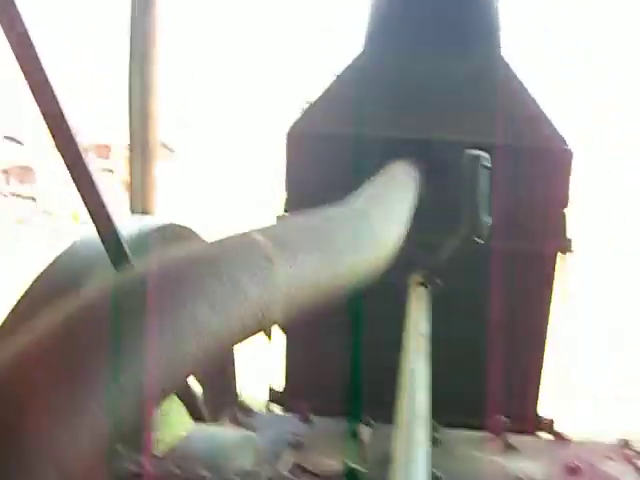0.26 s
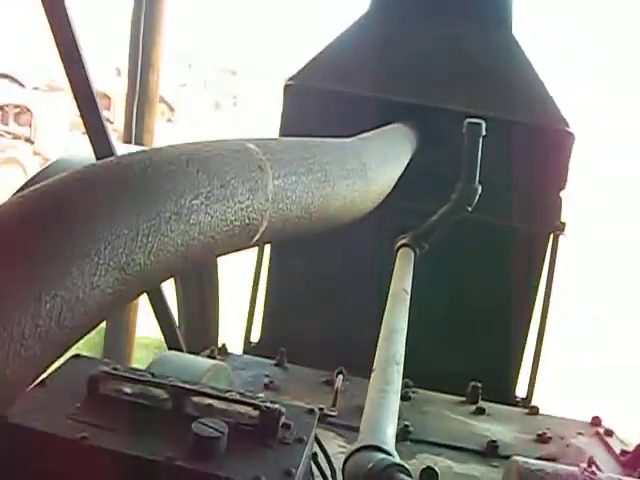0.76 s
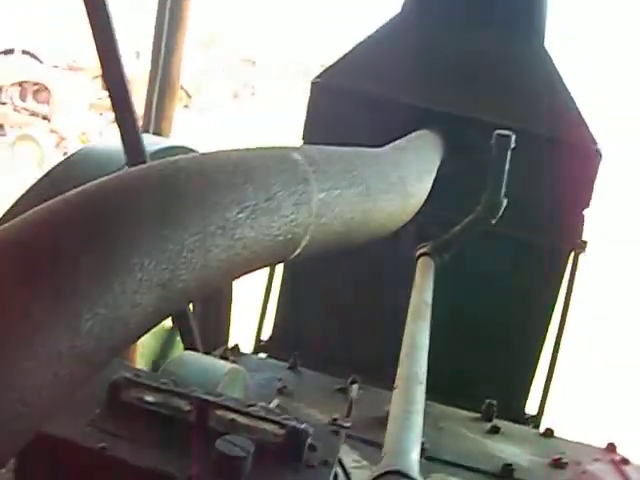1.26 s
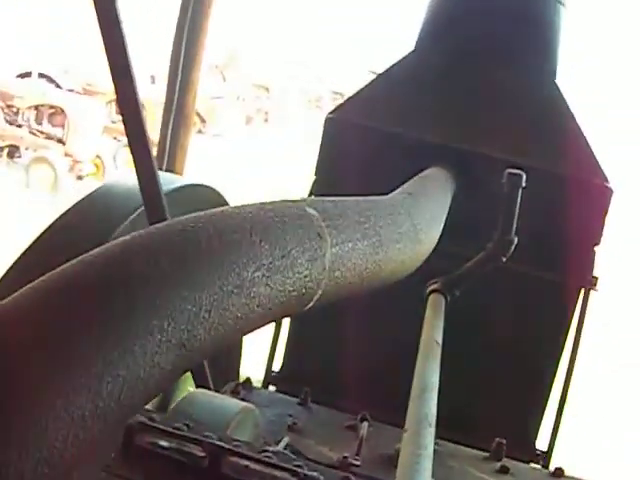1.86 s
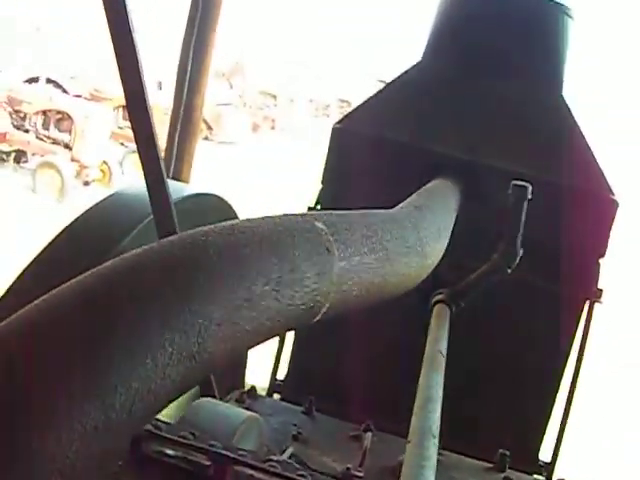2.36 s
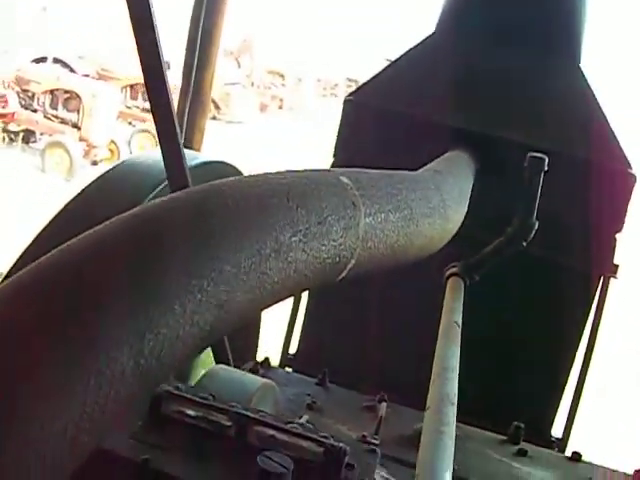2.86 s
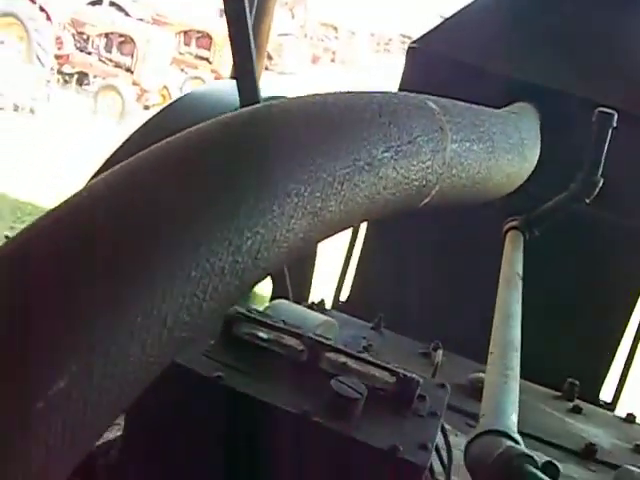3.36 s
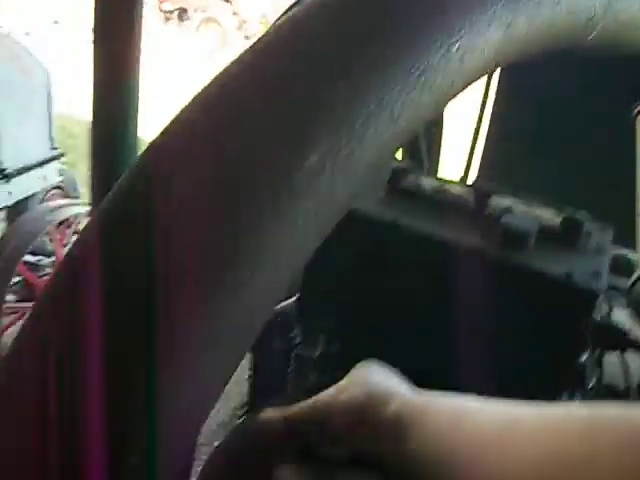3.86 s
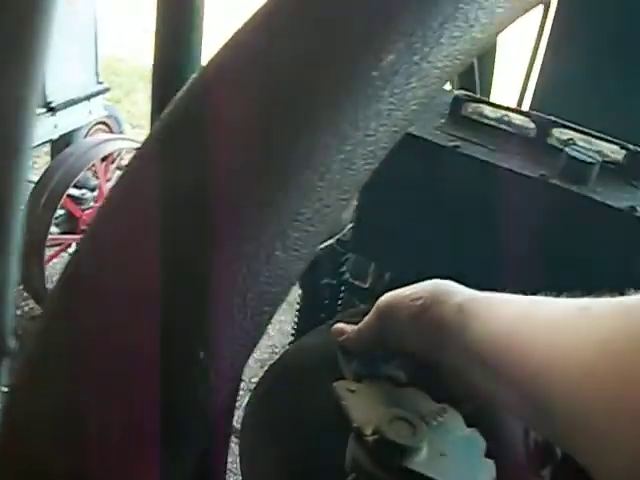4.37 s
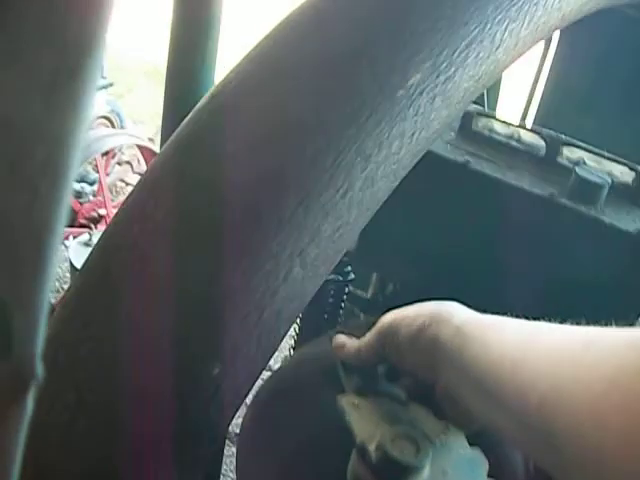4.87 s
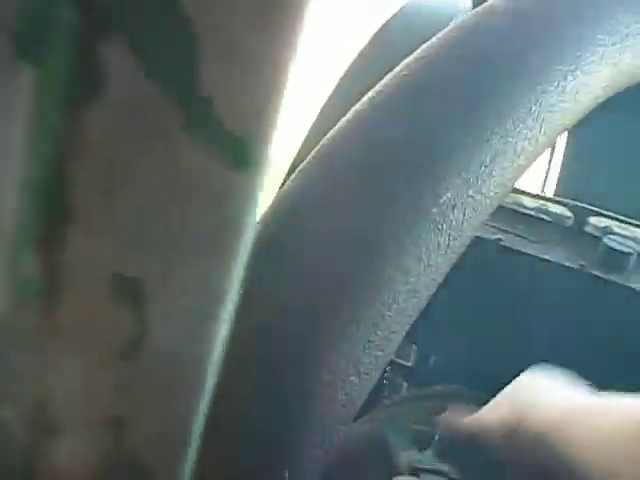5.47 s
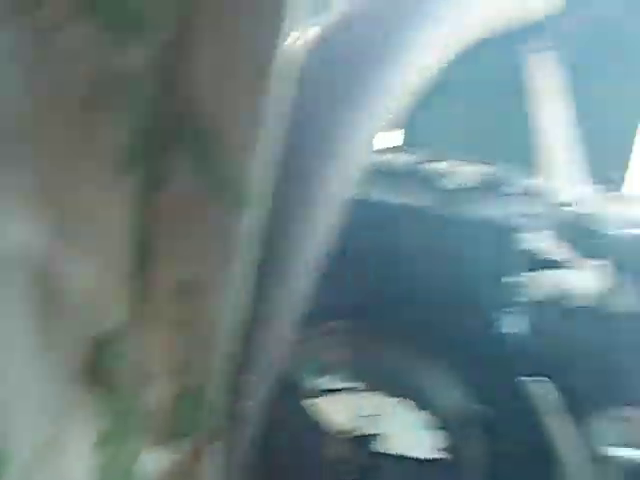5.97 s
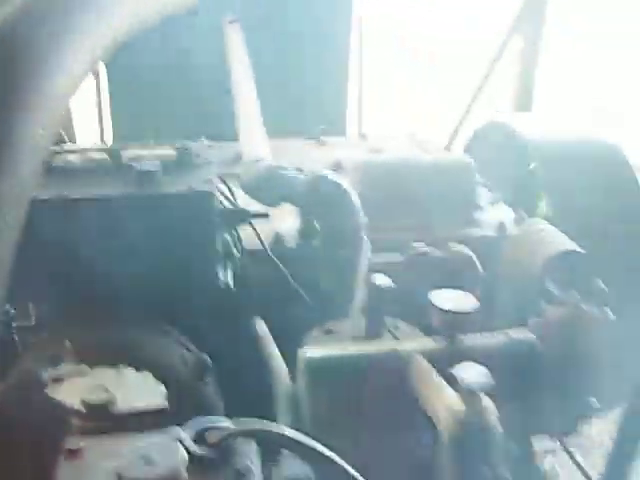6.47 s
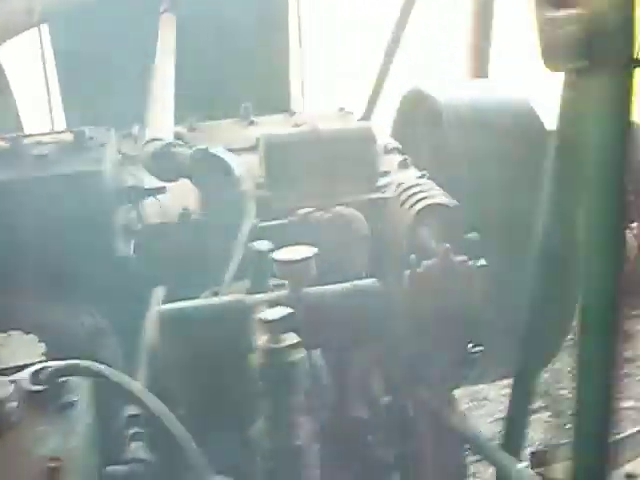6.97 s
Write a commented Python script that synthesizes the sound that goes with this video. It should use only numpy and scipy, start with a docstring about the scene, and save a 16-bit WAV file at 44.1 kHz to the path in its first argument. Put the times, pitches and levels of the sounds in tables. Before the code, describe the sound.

Close by, a slow old tractor engine puffs and thumps steadily while loose metal parts knock, tick and rattle.

```python
"""An old, slow tractor engine chugs and clatters, heard from its platform.
Every half turn the exhaust lets out a puff that hisses and thumps. Loose parts knock on the iron
castings (the engine's body) and the steel valve gear ticks and scrapes, over a dense patter and roar.
One microphone picks it all up; it turns itself down and overloads on the hardest puffs."""
import sys
import numpy as np
from scipy import signal
from scipy.fft import rfft, irfft, next_fast_len
from scipy.io import wavfile
from scipy.ndimage import uniform_filter1d

SR = 44100
rng = np.random.default_rng(int(sys.argv[2]) if len(sys.argv) > 2 else 0)


def bounce(signal):
    """Save signal as a 16-bit WAV file at the path given by the first command-line argument."""
    frames = np.transpose(np.atleast_2d(signal))
    limited = np.clip(frames, -1, 1)
    pcm = np.round(limited * 32767).astype(np.int16)
    wavfile.write(sys.argv[1], SR, pcm)


N = 318402

# exhaust puffs: (time [s], hiss level [dB], thump level [dB])
EXHAUST_PUFFS = [(0.0677, -13, -18.5), (0.289, -14.5, -54), (0.487, -13, -17.5), (0.709, -19.5, -37.5),
                 (0.908, -12, -26.5), (1.132, -15.5, -18), (1.332, -15, -30), (1.552, -12, -21.5),
                 (1.757, -12.5, -18.5), (2.1748, -5, -6.5), (2.358, -21.5, -26), (2.578, -7, -6),
                 (2.967, -5.5, -3.5), (3.175, -25, -18.5), (3.529, -15, -27), (3.715, -7.5, -5.5),
                 (3.912, -20, -25), (4.0886, -11.5, -21.5), (4.287, -12.5, -43), (4.5, -13, -31.5),
                 (4.839, -10, -18), (5.043, -14.5, -45.5), (5.254, -11.5, -47), (5.419, -17, -38),
                 (5.6, -11, -16.5), (5.796, -12, -41), (6.006, -14.5, -33), (6.181, -13.5, -18.5),
                 (6.361, -8.5, -29), (6.738, -14, -34), (6.95, -18.5, -21.5), (7.13, -13, -16)]
# modes (notes a part rings at) of the iron castings: (pitch [Hz], width [Hz], level [dB])
IRON_LOW_MODES = [(164, 31, -6), (298, 57, 2.5), (355.3, 20, 5), (456.4, 76, 2), (539, 36, 4), (632, 66, 5),
                  (732, 41, 8.5), (805, 109, 1.5), (910, 70, 1.5), (1031, 60, 1)]
IRON_HIGH_MODES = [(1333, 180, -1), (1450, 20, 3.5), (1535, 100, -3), (2210, 1100, -16)]
# modes of the steel valve gear: (pitch [Hz], width [Hz], level [dB])
STEEL_LOW_MODES = [(2358, 20, -5.5), (2550, 170, -2.5), (3107, 100, -8.5), (3436, 110, -10)]
STEEL_HIGH_MODES = [(3895, 70, -1), (4190, 40, -2.5), (4370, 540, 1.3), (5090, 43, -3.5)]


def amp(db):
    """Turns decibels into a factor to multiply by."""
    return 10 ** (np.asarray(db) / 20)


def unit(x):
    """Scales x to an average (rms) level of 1."""
    return x / np.sqrt(np.mean(x ** 2) + 1e-20)


def add(track, start_s, sound):
    """Mixes a sound into the track from start_s on."""
    part = track[max(round(start_s * SR), 0):][:len(sound)]
    part += sound[:len(part)]


def filtered(x, response):
    """Multiplies each frequency in x by response(hz)."""
    size = next_fast_len(N + SR // 2)
    return irfft(rfft(x, size) * response(np.fft.rfftfreq(size, 1 / SR)), size)[..., :N]


def coloured(x, spectrum):
    """Shapes x by (Hz, dB) points, silent outside them; the result has level 1."""
    points_hz, db = np.transpose(spectrum)
    return unit(filtered(x, lambda hz: amp(np.interp(np.log(hz + 1), np.log(points_hz), db, -120, -120))))


def resonate(force, modes):
    """A force makes a part ring at its modes; steady white noise keeps its level."""
    def response(hz):
        return sum((-1) ** k * amp(db) * 1j * hz * width / (pitch ** 2 - hz ** 2 + 1j * hz * width)
                   for k, (pitch, width, db) in enumerate(modes))
    gain = np.sqrt(sum(amp(db) ** 2 * width * np.pi / SR for _, width, db in modes))
    return filtered(force, response) / gain


def patter(per_s, spread_db, fade_s):
    """The loudness curve of many small random hits, uneven in strength, each fading away."""
    when, chance = rng.random((int(per_s * N / SR), 2)).T
    strength = amp(-spread_db * np.log(0.039 + 0.53 * chance))
    hits = np.bincount((when * N).astype(int), strength ** 2, N)
    power = signal.lfilter([1], [1, -np.exp(-1 / (fade_s * SR))], hits)
    return unit(np.sqrt(power))


def clatter(modes, per_s, spread_db, fade_s):
    """Loose parts strike different spots, so each mode gets its own hits."""
    sound = np.zeros(N)
    for hz, width, db in modes:
        force = patter(per_s, spread_db, fade_s) * rng.standard_normal(N)
        sound += amp(db) * resonate(force, [(hz, width, 0)])
    return unit(sound)


def struck(events, low_modes, high_modes, blow, rise_s, tail_s):
    """A blow and the rattle after it ring a part's low and high modes."""
    forces, t = np.zeros((2, N)), np.arange(SR // 5) / SR
    for s, db, high_db, length_s in events:
        rattle = np.exp(-t / tail_s) / (1 + (t / length_s) ** 3)
        force = amp(db) * (1 - np.exp(-t / rise_s)) * (rattle + blow * np.exp(-t / 0.0014))
        high_share = amp(high_db)
        add(forces[0], s, force * np.sqrt(1 - high_share ** 2))
        add(forces[1], s, force * high_share)
    low, high = forces * rng.standard_normal((2, N))
    sound = resonate(low, low_modes) + resonate(high, high_modes)
    power = lambda x: np.abs(uniform_filter1d(x ** 2, size=400)) + 1e-5
    # partly even out the noise's random swells, so each rattle follows its blow and fades smoothly
    return sound * np.minimum(power(np.hypot(*forces)) / power(sound), 4) ** 0.25


def pipe_hum(noise):
    """The exhaust pipe hums on a low note and swells half a turn after each thump."""
    level, t = np.full(N, amp(-27.5)), np.arange(SR // 2) / SR
    half_turn_s, width_s = 0.2, 0.098
    swell = np.exp(-((t - half_turn_s) / width_s) ** 2)
    for s, _, thump_db in EXHAUST_PUFFS:
        add(level, s, amp(min(thump_db - 10, -20.5)) * swell)
    hum = resonate(noise, [(76.6, 14.3, 0)])
    loudness = np.abs(signal.hilbert(hum, next_fast_len(N))[:N])
    return level * unit(hum / (loudness + 0.26) ** 0.4)  # partly even out the hum's random swells


def roar():
    """Loose parts patter on the castings and in the valve gear; the pipe hums; the frame rumbles."""
    # loudness of the running engine: (time [s], castings level [dB], valve gear level [dB])
    levels = [(0.0, -9, -19), (0.14, -25, -22.5), (0.24, -19.5, -24), (1.29, -17, -24), (1.9, -19, -22),
              (2.25, -25.5, -31), (2.48, -25.5, -27.5), (3.05, -23.5, -28.5), (3.27, -23, -31.5),
              (3.4, -15, -20), (4.1, -22, -28.5), (4.22, -11, -21), (4.34, -21.5, -30), (4.52, -16, -21.5),
              (4.83, -19.5, -26), (5.29, -15, -21.5), (5.8, -21, -30.5), (6.05, -16, -22), (6.6, -19, -27),
              (6.8, -13.5, -17.5), (6.92, -19, -26.5), (7.22, -17, -22)]
    # tone of the castings, the valve gear and the frame: (frequency [Hz], level [dB])
    iron_tone = [(59, -30.5), (100, -2), (193, -2.5), (285, 4.5), (399, -1.5), (454, 1), (566, -5.5),
                 (627, 1), (723, -1.5), (1210, -9.5), (1880, -14.5), (4840, -120)]
    gear_tone = [(1500, -18), (2000, 2.5), (2600, 5), (4000, 0), (4700, 6.5), (5200, -1.5), (5450, -12.5),
                 (6400, -32)]
    frame_tone = [(15, -13), (30, -2), (60, -15), (130, -12), (250, -10.5)]
    times, *columns = np.transpose(levels)
    iron_level, gear_level = [amp(np.interp(np.arange(N) / SR, times, db)) for db in columns]
    noise = rng.standard_normal((4, N))
    heavy = patter(per_s=66, spread_db=8.8, fade_s=0.073)  # heavy parts shake both castings and gear
    iron = coloured(noise[0] * (0.42 + 0.11 * heavy + 0.22 * patter(150, 11, 0.0018)), iron_tone)
    iron += 0.71 * clatter(IRON_LOW_MODES, 10, 2.5, 0.021)
    iron += 0.21 * clatter(IRON_HIGH_MODES, 14, 6, 0.011)
    gear = coloured(noise[1] * (0.1 + 1.2 * heavy + 0.57 * patter(140, 11, 0.005)), gear_tone)
    gear += 0.5 * clatter(STEEL_LOW_MODES + STEEL_HIGH_MODES, 45, 3.5, 0.004)
    rumble = amp(-11.5) * coloured(noise[3], frame_tone)
    whole = iron_level * (iron + rumble) + gear_level * gear + pipe_hum(noise[2])
    return filtered(whole, lambda hz: amp(-(np.maximum(hz - 5500, 0) / 30) ** 2))  # cut the top treble


def knocks():
    """Heavy parts with slack in them hammer the castings."""
    # knocks: (time [s], level [dB], share of the high modes [dB], rattle length [s])
    hits = [(0.003, -6, -8.5, 0.012), (0.152, -15.5, -24.5, 0.24), (0.418, -10.5, -13, 0.047),
            (0.552, -23.5, -28, 0.094), (0.624, -16.5, -6.5, 0.061), (0.862, -14, -10.5, 0.034),
            (1.07, -12.5, -9.5, 0.037), (1.414, -13, -24.5, 0.042), (1.693, -12.5, -18, 0.047),
            (1.88, -12.5, -15, 0.06), (2.098, -10.5, -23, 0.038), (2.153, -10, -16.5, 0.024),
            (2.313, -13, -16, 0.095), (2.53, -9, -6.5, 0.043), (2.709, -15.5, -11.5, 0.092),
            (2.909, -13, -10.5, 0.076), (3.636, -12.5, -6, 0.029), (3.659, -8.5, -13.5, 0.019),
            (4.065, -8, -7.5, 0.032), (4.165, -17.5, -9, 0.1), (4.411, -10, -7.5, 0.035),
            (4.62, -11, -9.5, 0.015), (4.78, -10, -12.5, 0.062), (4.912, -10, -31, 0.015),
            (4.986, -14.5, -17.5, 0.034), (5.142, -16, -13, 0.15), (5.557, -5, -10.5, 0.025),
            (5.957, -14.5, -5, 0.059), (6.308, -13, -6, 0.04), (6.516, -15, -4.5, 0.024),
            (6.659, -15, -9, 0.12), (7.089, -11, -13.5, 0.045)]
    return struck(hits, IRON_LOW_MODES, IRON_HIGH_MODES, blow=0.7, rise_s=0.0012, tail_s=0.27)


def exhaust():
    """Each puff is a hissing jet that drops as the port shuts, and a thump of pressure in the pipe."""
    # tone of the gas jet: (frequency [Hz], level [dB])
    jet_tone = [(800, -15.5), (2000, -17), (2800, -11.5), (4500, -7.5), (5450, -8), (6400, -12.5)]
    flow, thumps, t = np.zeros(N), np.zeros(N), np.arange(SR // 5) / SR
    step = lambda at_s, width_s: 0.5 + 0.5 * np.tanh((t - at_s) / width_s)
    fade = lambda from_s, fade_s: np.exp((from_s - t) / fade_s)
    push_s, echo_s, calm_s = 0.015, 0.03, 0.039
    suction = -1.2 * (t / push_s) ** 3 * (1 - step(push_s, 0.001))
    push = 1.23 * step(push_s, 0.00033) * fade(push_s, 0.03) * (1 - step(echo_s, 0.0012))
    # the pipe's open end sends the push back upside down
    rebound = -1.1 * step(echo_s, 0.00094) * fade(echo_s, 0.043) * (1 - step(calm_s, 0.0022))
    overtone = 0.37 * step(push_s, 0.001) * np.sin(2 * np.pi * 150 * (t - push_s)) * fade(push_s, 0.015)
    gas_sway = np.cos(2 * np.pi * 60 * (t - calm_s - 0.003)) + 0.7 * np.sin(2 * np.pi * 165 * t)
    settling = 0.4 * step(calm_s, 0.002) * gas_sway * fade(calm_s, 0.035)
    onset = 1 - np.exp(-(t / 0.0041) ** 2)
    for s, hiss_db, thump_db in EXHAUST_PUFFS:
        open_s = min(0.018 + 0.42 * amp(thump_db) ** 2, 0.032)  # longer for a hard puff
        port_open = 1 - step(open_s, 0.0021)
        add(flow, s, amp(hiss_db) * onset * (fade(0, 0.029) * port_open + 0.32 * fade(0, 0.061)))
        add(thumps, s, amp(thump_db) * (suction + push + rebound + overtone + settling))
    flow *= unit(1 + 0.7 * patter(300, 5, 0.0015))  # the jet sputters
    force = flow * rng.standard_normal((2, N))
    jet = flow * coloured(rng.standard_normal(N), jet_tone)
    steel = resonate(force[0], STEEL_LOW_MODES + STEEL_HIGH_MODES)
    iron = resonate(force[1], IRON_LOW_MODES)
    return jet + 0.38 * steel + 0.18 * iron + thumps


def valve_ticks():
    """A small steel part snaps, rings briefly on its own note and rattles its neighbours."""
    # ticks of the valve gear: (time [s], level [dB], pitch [Hz])
    snaps = [(0.0749, -14, 2370), (0.178, -10, 2870), (0.2858, -10, 2530), (0.3451, -13.5, 2450),
             (0.494, -8.5, 3700), (0.5723, -14, 2385), (0.676, -10, 4560), (0.713, -6, 2900),
             (0.7602, -10, 2970), (0.9068, -17, 3500), (1.018, -9, 2760), (1.1868, -7, 2460),
             (1.336, -9.5, 4030), (1.359, -15, 2430), (1.5565, -11, 2960), (1.6756, -12.5, 4500),
             (1.733, -15, 4420), (1.757, -2.5, 2750), (1.863, -8.5, 2900), (1.901, -10.5, 4000),
             (1.925, -13, 3950), (2.0275, -7.5, 3900), (2.157, -11, 4360), (2.3381, -12.5, 2240),
             (3.5423, -10, 2390), (4.0944, -4, 3760), (4.189, -9, 3900), (4.291, -8.5, 3100),
             (4.561, -10, 2740), (4.796, -14, 2560), (4.8461, -7.5, 4100), (4.9397, -12.5, 2510),
             (5.319, -7, 3040), (5.4251, -13, 2120), (5.494, -10.5, 2380), (5.6065, -14.5, 2670),
             (5.698, -11.5, 3950), (5.8, -7.5, 2980), (6.015, -9.5, 3740), (6.0606, -12, 4200),
             (6.1848, -10.5, 2170), (6.5646, -8.5, 3490), (6.7783, -8, 2660), (6.8446, -10.5, 3700),
             (7.0014, -11, 2370), (7.1398, -8.5, 2790)]
    notes, t = np.zeros(N), np.arange(SR // 20) / SR
    fade_cycles, rattle_s = 17.7, 0.018
    for (s, db, hz), phase in zip(snaps, rng.random(len(snaps))):
        loudness = amp(db) * (1 - np.exp(-t / 0.0035)) * np.exp(-t * hz / fade_cycles)
        add(notes, s, loudness * np.sin(2 * np.pi * (hz * t + phase)))
    rattles = [(s, db - 4.5, -0.5, rattle_s) for s, db, _ in snaps]
    return notes + struck(rattles, STEEL_LOW_MODES, STEEL_HIGH_MODES, blow=0.24, rise_s=0.0019,
                          tail_s=0.021)


def clean_blows():
    """One short contact rings the castings' middle modes in step; they soon drift apart and cancel."""
    # single blows on the castings: (time [s], peak level [dB])
    hits = [(0.154, -4.5), (0.423, -0.5), (0.472, -5.5), (0.858, -3.5), (1.416, 1), (1.488, -8.5),
            (2.109, -1.5), (2.175, -7), (2.535, -6), (3.417, 0), (3.634, -8), (4.08, -12.5), (4.254, -4),
            (4.427, -6), (4.622, 1), (4.845, -6.5), (5.109, -5), (5.146, -13), (5.296, -1.5), (5.561, -9),
            (6.311, -6), (6.524, -7.5), (6.88, -1.5)]
    sound, t = np.zeros(N), np.arange(SR // 20) / SR
    peak_s = 0.003
    ring = sum(amp(db) * np.cos(2 * np.pi * hz * (t - peak_s)) for hz, _, db in IRON_LOW_MODES[4:9])
    ring *= (t / peak_s * np.exp(1 - t / peak_s)) ** 2
    for s, db in hits:
        add(sound, s, amp(db) * ring / ring.max())
    return sound


def hollow_parts():
    """A loose hollow iron part chatters for some dozens of cycles and sings near its pitch."""
    # singing parts: (time [s], level [dB], pitch [Hz])
    rings = [(0.4259, -14, 1560), (0.55, -23, 725), (0.504, -23.5, 1517), (0.862, -11.5, 1580),
             (0.895, -19, 1074), (1.561, -15.5, 533), (1.808, -17.5, 2520), (1.93, -15.5, 528),
             (2.116, -17, 1600), (2.12, -14, 518), (3.592, -19, 2450), (4.4227, -19.5, 1696),
             (4.9763, -14.5, 1595), (5.146, -14.5, 1596), (6.53, -23, 631)]
    sound, t = np.zeros(N), np.arange(SR // 4) / SR
    fade_cycles, purity = 56, 60  # a purer note drifts less
    for s, db, hz in rings:
        drift = np.cumsum(rng.standard_normal(len(t))) * np.sqrt(2 * np.pi * hz / purity / SR)
        loudness = amp(db) * (1 - np.exp(-t * hz / 5)) * np.exp(-(t * hz / fade_cycles) ** 2)
        add(sound, s, loudness * np.sin(2 * np.pi * hz * t + drift))
    return sound


def scrapes():
    """Steel slides over steel and rattles mainly the high modes of the valve gear."""
    # scrapes: (time [s], level [dB], length [s])
    slides = [(0.622, -25.5, 0.044), (0.993, -22, 0.14), (1.9, -17.5, 0.09), (3.37, -25, 0.096),
              (4.438, -23, 0.07), (5.96, -19.5, 0.07), (6.053, -23, 0.057)]
    rattles = [(s, db, -0.5, length_s) for s, db, length_s in slides]
    return struck(rattles, STEEL_LOW_MODES, STEEL_HIGH_MODES, blow=0, rise_s=0.005, tail_s=0.3)


def gain_control(x):
    """Strong bass turns the volume down; it creeps back afterwards."""
    bass_hz, threshold_db, depth, recovery_s, delay_s = 96, -23, 0.57, 0.46, 0.018
    bass = signal.lfilter(*signal.butter(1, bass_hz, fs=SR), x)
    memory = np.exp(-1 / (recovery_s * SR))
    power = signal.lfilter([1 - memory], [1, -memory], bass ** 2)
    late_power = np.pad(power, ((0, 0), (round(delay_s * SR), 0)))[:, :N]
    return x * (1 + (late_power / amp(threshold_db) ** 2) ** 2) ** (-depth / 4)


def scene():
    """All parts reach one microphone, so both channels are the same."""
    engine = roar() + knocks() + exhaust() + valve_ticks() + clean_blows() + hollow_parts() + scrapes()
    return np.array([engine, engine])


def record(dry):
    """The microphone dulls the treble, turns down after hard puffs and overloads on the peaks."""
    dull_hz, dull_db, ceiling, top_hz = 5590, -9.5, 1.274, 5819
    dulled = filtered(dry, lambda hz: amp(dull_db * (0.5 + 0.5 * np.tanh((hz - dull_hz) / 100))))
    ducked = gain_control(dulled)
    left, right = ducked / (1 + np.abs(ducked / ceiling) ** 6) ** (1 / 6)  # round off the peaks
    stereo = np.array([np.pad(left, (4, 0))[:N], right])  # the left channel runs four samples late
    return filtered(stereo, lambda hz: amp(-(np.maximum(hz - top_hz, 0) / 75) ** 2))


dry = scene()
out = record(dry)
bounce(out)
```